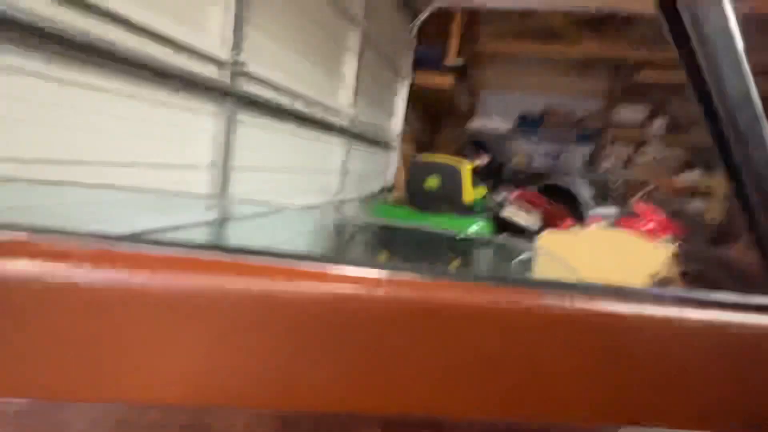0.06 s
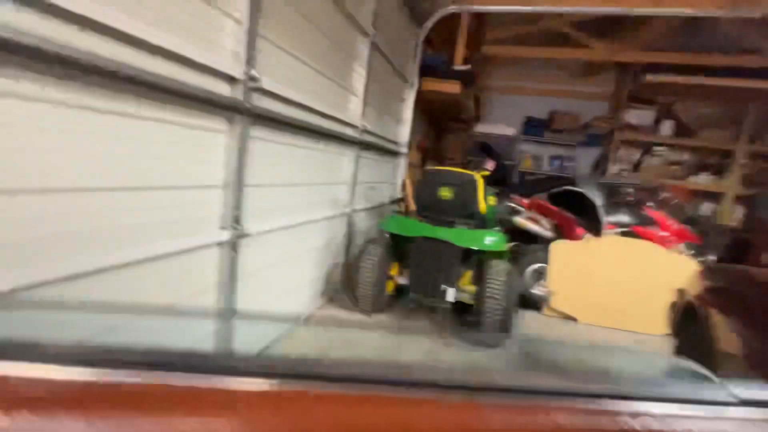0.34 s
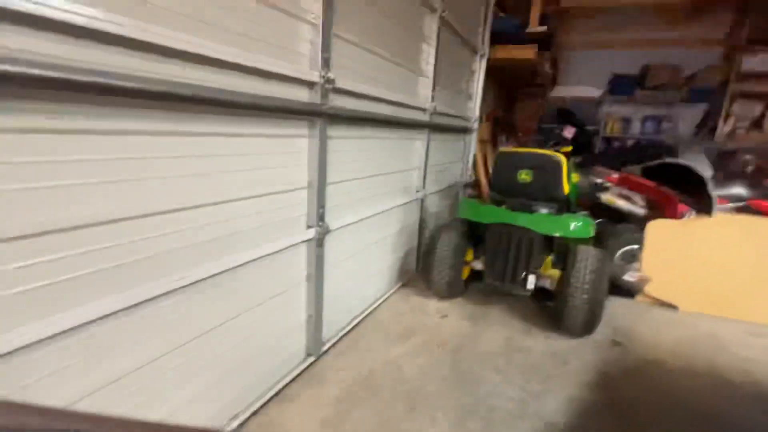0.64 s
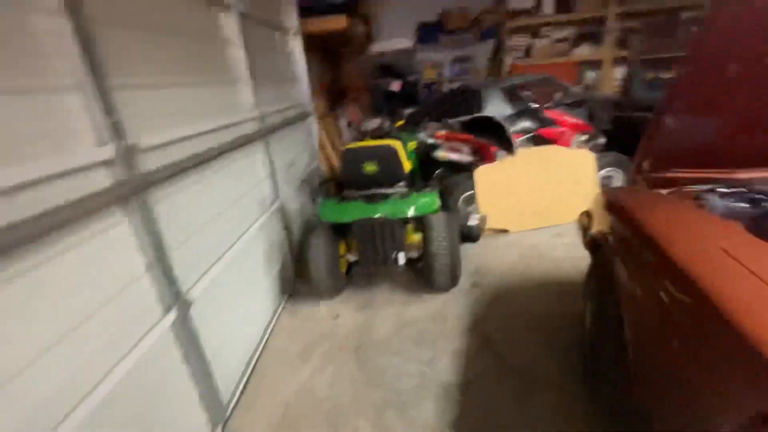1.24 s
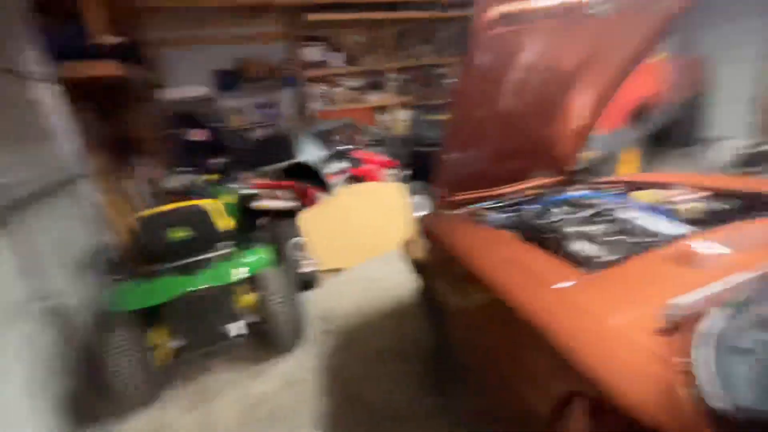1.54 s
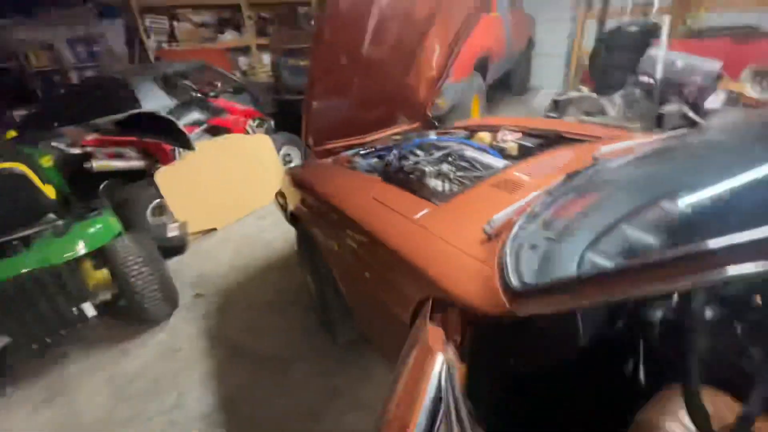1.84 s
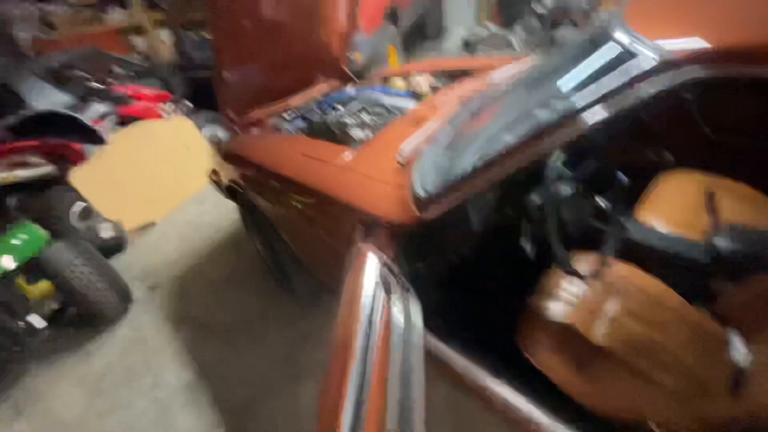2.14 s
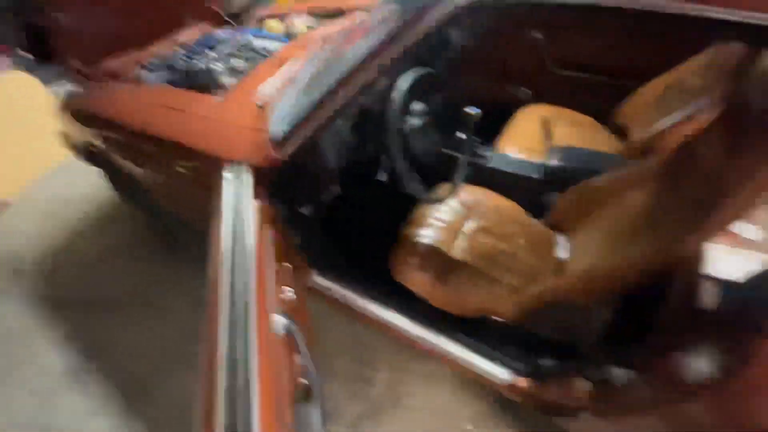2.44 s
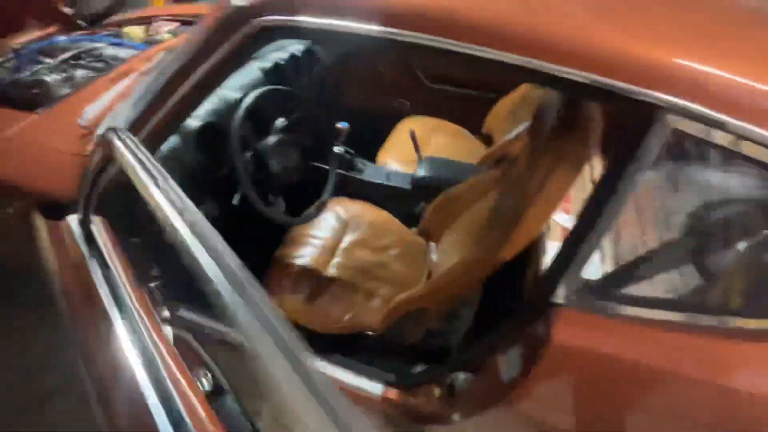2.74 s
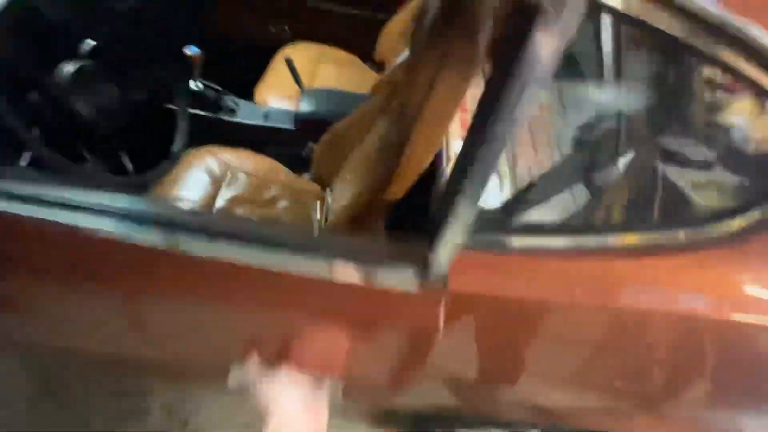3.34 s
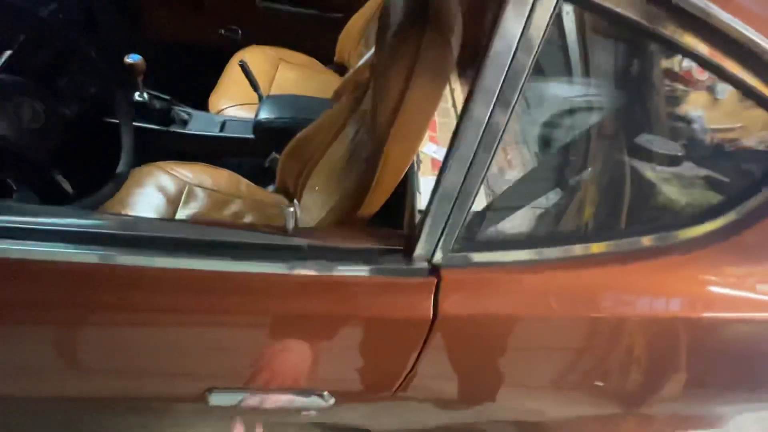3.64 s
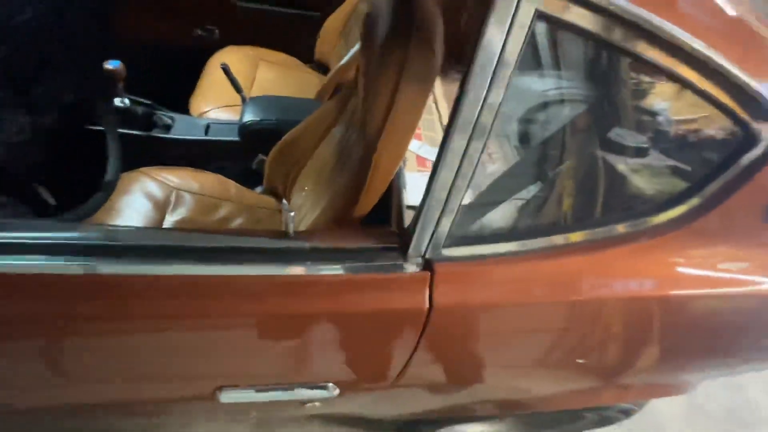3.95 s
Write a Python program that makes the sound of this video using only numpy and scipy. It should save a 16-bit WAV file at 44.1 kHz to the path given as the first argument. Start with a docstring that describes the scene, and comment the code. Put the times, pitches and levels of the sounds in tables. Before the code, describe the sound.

A car engine idles in a garage with a deep drone, fan hiss and light ticking as the microphone moves past the open hood. Near the end, the car door slams once with a click, thud and brief rattle.

```python
"""In a garage, a six-cylinder car idles while the microphone moves from the cabin past the open bonnet.
The exhaust drones at the rate the cylinders fire. The fan hums and hisses, the valves tick and
engine parts ring. Near the end a door is swung shut: latch, thud and a short rattle echo in the room.
The slam makes an automatic volume control dip and recover."""
import sys
import numpy as np
from scipy import signal
from scipy.fft import rfft, irfft
from scipy.io import wavfile
from scipy.ndimage import minimum_filter1d

SR = 44100
rng = np.random.default_rng(int(sys.argv[2]) if len(sys.argv) > 2 else 0)


def unload_audio(sound):
    """Save the sound as a 16-bit wav file, at the path given as the first command line argument."""
    columns = np.transpose(np.atleast_2d(sound))
    # keep every value between -1 and 1, then stretch to whole-number steps
    steps = np.round(np.clip(columns, -1, 1) * 32767)
    wavfile.write(sys.argv[1], SR, steps.astype(np.int16))


N = 4 * SR
T = np.arange(N) / SR
HZ = np.fft.rfftfreq(N, 1 / SR)
SIDES = np.array([[.5], [-.5]])  # splits a difference between left and right

# How the engine bay swells and fades; only the change around each column's average counts.
# Each row: time in seconds, then dB for the low, 1 kHz, middle, upper middle and treble bands.
BAY_LEVELS = [(0.1, -34.1, -38.0, -34.6, -35.7, -38.8), (0.4, -35.1, -36.2, -34.6, -35.6, -39.7),
              (0.7, -37.2, -33.8, -34.4, -35.8, -39.2), (1.05, -38.2, -35.2, -34.0, -35.0, -38.2),
              (1.35, -36.6, -34.2, -32.7, -33.5, -36.9), (1.65, -36.2, -33.1, -30.4, -34.3, -37.1),
              (1.95, -35.3, -32.4, -30.8, -36.0, -38.4), (2.3, -35.4, -34.9, -34.0, -36.3, -39.3),
              (2.6, -35.2, -36.5, -34.7, -37.0, -39.9), (2.9, -36, -35.6, -35.1, -37.5, -40.7),
              (3.22, -37.4, -37.2, -35.7, -37.3, -41.5), (3.85, -37.6, -34.8, -35.7, -37.3, -41.5)]


def exhaust(crank):
    """Three firings in each turn of the crankshaft make a deep tone, its octave and weaker tones."""
    # Each row: time in seconds, dB of the deep tone, octave and weaker tones, deep tone's pan in dB.
    levels = [(0.07, -11.6, -18.7, -26.5, -6.4), (0.65, -11.7, -18.4, -29.5, -6.1),
              (1.15, -13.4, -15.2, -33, -6.3), (1.5, -14.0, -14.9, -34, -5.1),
              (1.8, -14.8, -16.1, -40, -4.9), (1.88, -15.8, -19, -41, -4.8), (1.98, -14.7, -16, -40, -4.6),
              (2.15, -14.1, -15.3, -38.1, -4.2), (2.7, -13.4, -15.4, -30.8, -4.1),
              (3, -13.3, -17.2, -30.2, -3.9), (3.15, -13.4, -21.5, -32.5, -4.1),
              (3.31, -13.3, -25.9, -33, -4.1), (3.8, -13.2, -18.6, -28.6, -4.2),
              (3.93, -13.3, -18.1, -29.9, -4.2)]
    # Each row: time in seconds, radians by which the deep tone is ahead on the left.
    left_lead = [(0, 0.087), (1.2, -0.5), (2.1, -0.95), (4, -1.05)]
    # The weaker tones. Each row: multiple of the crank speed, relative level in dB.
    overtones = [(4, -25), (7.5, -25.5), (9, -4.5), (12, -11.5), (14, -28), (15, -16), (18, -18.5)]
    lead = curve(left_lead)
    firing = 2 * np.pi * 3 * crank + lead * SIDES
    tone = np.cos(firing) * amp(curve(levels, 1)) * pan(curve(levels, 4))
    tone *= 1 + .02 * drift(hz=25)
    octave_phase = firing + firing.mean(0) + 2.24 - 1.44 * lead
    octave = np.cos(octave_phase) * amp(curve(levels, 2)) * pan(db=-6)
    octave *= 1 + .04 * drift(hz=24.3)
    drone = (tone + octave) / np.cos(lead / 2)  # keeps the centre level as the sides drift apart
    return np.sqrt(2) * drone + wavering_tones(crank, overtones, curve(levels, 3))


def door():
    """Latch, striker and seal meet in quick turn, ringing first the latch, then panel and shell."""
    # Each row: start in seconds, then relative dB of the clack, snap, thud, latch and shell.
    contacts = [(3.383, -9, -9.5, -28, -17.5, -34), (3.3946, -2, -5, -12, -7, -27),
                (3.4205, -5, -9, -3, -12, -13), (3.448, 0.5, -11.5, -9, -23, -8),
                (3.471, -10, -29, -8, -37, -14), (3.531, -10.5, -24.5, -15.5, -38, -21),
                (3.565, -24, -39, -12, -49, -28), (3.632, -19.5, -48, -23, -45, -28)]
    # The tone of three noise bursts. Each row: frequency in Hz, relative level in dB.
    clack_colour = [(200, -28), (500, 2.5), (900, 1.5), (1500, -1.5), (2400, -3.5), (3300, -14),
                    (6000, -16.5), (13000, -51)]
    snap_colour = [(800, -5), (2500, 10.5), (3800, 5.5), (7000, 2.5), (10500, 2), (13000, -10),
                   (15000, -26)]
    thud_colour = [(25, -16), (60, -4), (150, -3), (220, -3), (340, 0), (500, -5), (900, -16), (3000, -50)]
    # Parts that ring. Each row: pitch in Hz, relative level in dB, seconds to fade by 60 dB.
    steel_latch = [(640, -8, .14), (915, 0, .16), (1240, -2, .14), (1775, -5, .12), (1825, -2, .14),
                   (2360, -3, .09), (2760, -6, .1), (2875, -7, .12)]
    shell_and_frame = [(655, -8, .14), (735, 0, .19), (860, 0, .19), (947, -4, .17), (1039, -5, .17),
                       (1405, -11, .25), (1685, -11, .15), (2182, -9, .14), (2546, -9, .12)]
    hollow_panel = [(142, -5, .18), (266, -3, .22), (342, 1.5, .09), (425, 1, .04)]
    clack_fade_s, snap_fade_s, thud_fade_s = .11, .14, .21
    snap_rise_s, rise_s = .0013, .0055
    out = np.zeros((2, N))
    for start, clack_db, snap_db, thud_db, latch_db, shell_db in contacts:
        t = np.maximum(T - start, 0)
        snap = amp(snap_db - 60 * t / snap_fade_s) * noise(spectrum(snap_colour))
        clack = amp(clack_db - 60 * t / clack_fade_s) * noise(spectrum(clack_colour))
        thud = amp(thud_db - 5 - 60 * t / thud_fade_s) * noise(spectrum(thud_colour))
        out += snap * np.minimum(t / snap_rise_s, 1) + (clack + thud) * np.minimum(t / rise_s, 1)
        out += amp(latch_db) * struck(steel_latch, start)
        out += amp(shell_db) * struck(shell_and_frame, start)
        out += amp(thud_db - 4) * struck(hollow_panel, start)
    return out


def engine_bay(crank):
    """Rushing fan air and valve ticks ring in the space around the engine."""
    # The tone of the rush. Each row: frequency in Hz, relative level in dB.
    rush_colour = [(160, -59), (270, -16), (298, -1.5), (329, -6), (400, -4), (448, -5.5), (555, 1),
                   (745, -8.5), (822, -3), (984, -4.5), (1280, -8), (1390, -5.5), (1560, -7.5),
                   (2270, -7.5), (4740, -13.5), (5960, -17), (10200, -20.5), (12200, -28), (13500, -36)]
    # Pitches the bay boosts. Each row: frequency in Hz, width in Hz, boost in dB.
    resonances = [(531, 20, 2.5), (666, 160, 0), (673, 20, 6.5), (1260, 300, 1.5), (2180, 89, 2.5),
                  (3280, 310, 2), (5240, 620, 1.5), (6260, 44, 4.5), (10460, 91, 5)]
    # Each row: frequency in Hz, dB by which the left is louder.
    balance = [(60, 0), (98, -8), (160, 47), (260, 2), (430, -5), (700, 1), (1140, -0.5), (1850, -2.0),
               (3030, -2), (4940, 3), (8060, -4), (13200, 0)]
    colour = spectrum(rush_colour) + sum(db * peak(hz, width) for hz, width, db in resonances)
    colour = colour + spectrum(balance) * SIDES
    rush = noise(colour) * amp(.5 * drift(hz=19) + .18 * np.sin(2 * np.pi * crank))
    ticks = amp(-11.5) * valve_pulses(crank) * noise(colour)
    return amp(-25.5) * pass_bonnet(shifting_reflections(rush + ticks))


def valve_pulses(crank, count=12, fade_s=.0046):
    """The loudness of the valves: twelve uneven taps in every two turns of the crank."""
    step = (crank * count / 2).astype(int)
    starts = np.flatnonzero(np.diff(step))
    valve_db = -.5 * rng.standard_normal(count)
    hits = np.zeros(N)
    hits[starts] = amp(valve_db[step[starts] % count] + 5 * rng.standard_normal(len(starts)))
    return unit(signal.lfilter([1], [1, -np.exp(-1 / (SR * fade_s))], hits))


def pass_bonnet(sound):
    """Five frequency bands swell and fade as the microphone passes the open bonnet."""
    # For each band, low to high: the share of its dB change that the left-right difference follows.
    side_share = [.1, .6, .7, .8, .9]
    lowpasses = [1 / (1 + (HZ / hz) ** 8) for hz in (760, 1120, 2650, 5300)]
    bands = np.diff([np.zeros_like(HZ), *lowpasses, np.ones_like(HZ)], axis=0)
    out = 0
    for k, gain in enumerate(bands):
        band = irfft(rfft(sound) * gain, N)
        centre = band.mean(0)
        change_db = bay_change_db(k + 1)
        out += centre * amp(change_db) + (band - centre) * amp(side_share[k] * change_db)
    return out


def shifting_reflections(sound, size=2048, patch_hz=28, patch_s=.058):
    """Narrow peaks and dips come and go as the microphone moves through the reflections."""
    hz, t, slices = signal.stft(sound, SR, nperseg=size)
    across = np.exp(-((hz - hz.mean()) / patch_hz) ** 2 / 2)
    along = np.exp(-((t - t.mean()) / patch_s) ** 2 / 2)
    speckle = rng.standard_normal(slices.shape[1:])
    patches = unit(signal.fftconvolve(speckle, np.outer(across, along), "same"))
    depth_db = 2.8 / np.sqrt(1 + (hz[:, None] / 2800) ** 2)
    return unit(signal.istft(slices * amp(depth_db * patches), SR, nperseg=size)[1][:, :N])


def exhaust_rumble():
    """Low noise from the exhaust, mostly on the right."""
    # Each row: frequency in Hz, relative level in dB.
    colour = [(20, -17), (40, -5), (75, 5), (150, -4.5), (260, 1), (400, -23), (900, -61)]
    # Each row: time in seconds, level in dB.
    levels = [(0.2, -38), (0.7, -33.5), (1.3, -30.5), (1.9, -32), (2.4, -35), (3, -32)]
    return amp(curve(levels)) * noise(spectrum(colour)) * pan(db=-13.5)


def fan_hum(crank):
    """A belt drives the fan, so its hum follows the engine speed."""
    # Each row: multiple of the crank speed, relative level in dB.
    tones = [(9.87, 0), (19.9, -16)]
    # Each row: time in seconds, level in dB.
    levels = [(0.1, -33), (0.7, -36), (1.3, -39), (1.9, -42), (2.4, -37.5), (2.75, -33), (3.2, -29),
              (3.9, -31.5)]
    return wavering_tones(crank, tones, curve(levels))


def engine_ring(crank):
    """Engine parts ring near 1 kHz, shaken at the firing rate."""
    # Each row: pitch in Hz, width in Hz, relative level in dB.
    resonances = [(815, 26, -3), (866, 30, 0), (925, 24, 0), (975, 30, -2), (1019, 16, 1), (1108, 22, -6)]
    gain = sum(amp(db) * peak(hz, width) for hz, width, db in resonances)
    shake = 1 + .4 * np.sin(2 * np.pi * 3 * crank)
    return amp(-36.3 + bay_change_db(2)) * noise(20 * np.log10(gain)) * shake


def garage(sound, echo_db=-11.5, fade_s=.45):
    """The cluttered room scatters a sound into a short, dull echo."""
    t = T[:SR // 2]
    tail = rng.standard_normal((2, len(t))) * amp(-60 * t / fade_s) * (t > .008)
    tail = signal.lfilter(*signal.butter(1, 4000, fs=SR), tail / np.linalg.norm(tail[0]))
    return sound + amp(echo_db) * signal.fftconvolve(sound, tail, axes=1)[:, :N]


def wavering_tones(crank, tones, level_db):
    """Tones tied to the crank speed, each wavering in loudness."""
    out = 0
    for multiple, db in tones:
        gain = amp(db + level_db) * (1 + .14 * drift(hz=11.5))
        out += gain * np.cos(2 * np.pi * (multiple * crank + rng.random()))
    return np.sqrt(2) * out * pan(db=-7)


def struck(tones, start, rise_s=.0031):
    """A part rings out after one blow, with left and right a little out of step."""
    first = int(start * SR)
    t, out = T[:N - first], np.zeros((2, N))
    for hz, db, fade_s in tones:
        phase = rng.random() + np.array([[0], [rng.uniform(-.25, .25)]])
        out[:, first:] += amp(db - 60 * t / fade_s) * np.sin(2 * np.pi * (hz * t + phase))
    return out * np.clip((T - start) / rise_s, 0, 1)


def noise(colour_db):
    """Shaped noise of average power 1, as the two sides of the microphone hear it."""
    # Each row: frequency in Hz, left-right likeness from 0 to 1, radians by which the left is ahead.
    stereo = [(105, 1, 0.2), (240, 0.25, -0.67), (364, 0.046, 1), (516, 0.62, 2.5), (780, 0.6, 2),
              (1050, 1, 1.38), (1320, 0.46, 2.5), (1970, 0.17, 4.5), (2440, 0.22, 6), (2600, 0.41, 7),
              (4080, 0.13, 13), (5370, 0.26, 15.5), (6260, 0.14, 16.5), (8100, 0.25, 20), (9700, 0.22, 20),
              (9500, 0.79, 20), (10400, 1, 20)]
    left, other = rfft(rng.standard_normal((2, N)))
    likeness = np.clip(spectrum(stereo), 0, .995)
    right = (likeness * left + np.sqrt(1 - likeness ** 2) * other) * np.exp(-1j * spectrum(stereo, 2))
    return unit(irfft(np.array([left, right]) * amp(colour_db), N))


def bay_change_db(column):
    """How far one band of the engine bay is above its average level."""
    db = curve(BAY_LEVELS, column)
    return db - db.mean()


def amp(db):
    """Turns decibels into a gain."""
    return 10 ** (np.asarray(db) / 20)


def unit(x):
    """Scales a signal to an average power of 1."""
    return x / np.sqrt(np.mean(x ** 2) + 1e-20)


def curve(rows, column=1):
    """Joins a table's points into a line over time."""
    rows = np.array(rows)
    return np.interp(T, rows[:, 0], rows[:, column])


def spectrum(rows, column=1):
    """Joins a table's points into a line over frequency."""
    rows = np.array(rows)
    return np.interp(np.log(HZ + 1), np.log(rows[:, 0] + 1), rows[:, column])


def peak(hz, width):
    """A bump of height 1 around one frequency."""
    return 1 / (1 + (2 * (HZ - hz) / width) ** 2)


def pan(db):
    """Left and right gains; positive dB makes the left louder."""
    gains = amp(db * SIDES)
    return gains / gains.mean(0)


def drift(hz):
    """A random wobble, mostly slower than the given rate."""
    return unit(irfft(rfft(rng.standard_normal(N)) * np.exp(-(HZ / hz) ** 2) * (HZ > 0), N))


def duck(over_db, share, hold_s, recover_s):
    """A gain that falls at once, holds, then recovers."""
    size = int(hold_s * SR) // 2 * 2 + 1
    held = -minimum_filter1d(-over_db, size, origin=size // 2, mode="constant")
    fade = np.exp(-T / recover_s)
    return amp(-share * np.maximum.accumulate(held / fade) * fade)


def scene():
    """The engine idles a little unevenly and the door shuts."""
    # Each row: time in seconds, firings per second.
    idle_speed = [(0, 62.14), (0.3, 61.1), (0.6, 61.97), (0.85, 60.41), (1.1, 60.04), (1.35, 60.63),
                  (1.6, 60.03), (1.88, 59.11), (2.15, 60.24), (2.45, 60.15), (2.75, 61.2), (3.05, 59.78),
                  (3.35, 58.01), (3.55, 59.25), (3.75, 60.49), (4, 62.44)]
    firing_hz = curve(idle_speed) * (1 + .0031 * drift(hz=14.6))
    crank = np.cumsum(firing_hz) / SR / 3  # turns of the crankshaft so far
    engine = exhaust(crank) + fan_hum(crank) + exhaust_rumble() + engine_bay(crank)
    return engine + garage(door()) + engine_ring(crank)


def record(dry, threshold_db=-20, ceiling=.9, top_hz=13300):
    """The slam turns bass and treble down separately; peaks are rounded and the highest treble cut."""
    bass = signal.sosfiltfilt(signal.butter(2, 280, fs=SR, output="sos"), dry)
    rest = dry - bass
    power = signal.lfilter(*signal.butter(1, 18, fs=SR), (rest ** 2).mean(0))
    over_db = np.maximum(10 * np.log10(abs(power) + 1e-12) - threshold_db, 0)
    ducked = bass * duck(over_db, share=.49, hold_s=.12, recover_s=.022)
    ducked += rest * duck(over_db, share=.66, hold_s=.14, recover_s=.096)
    rounded = ducked / (1 + (ducked / ceiling) ** 20) ** (1 / 20)
    lowpass = signal.firwin(201, top_hz, window=("kaiser", 9), fs=SR)
    return signal.oaconvolve(rounded, lowpass[None], "same")


dry = scene()
out = record(dry)
unload_audio(out)
```